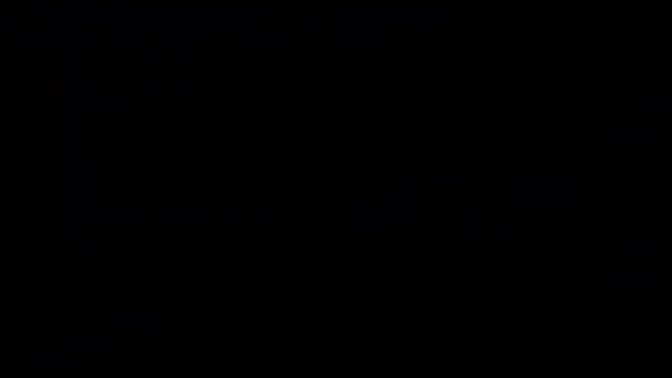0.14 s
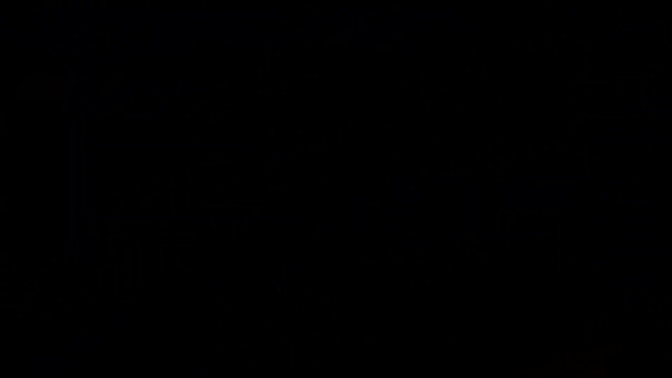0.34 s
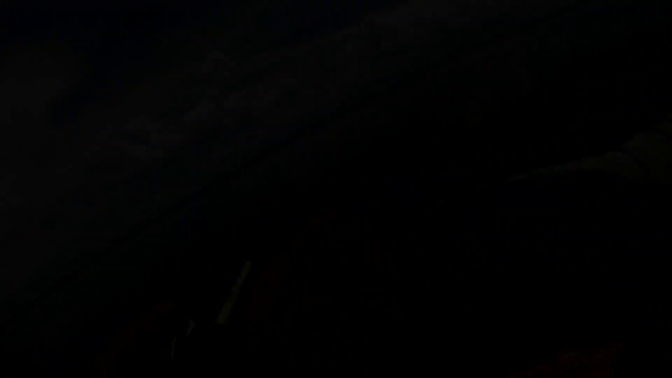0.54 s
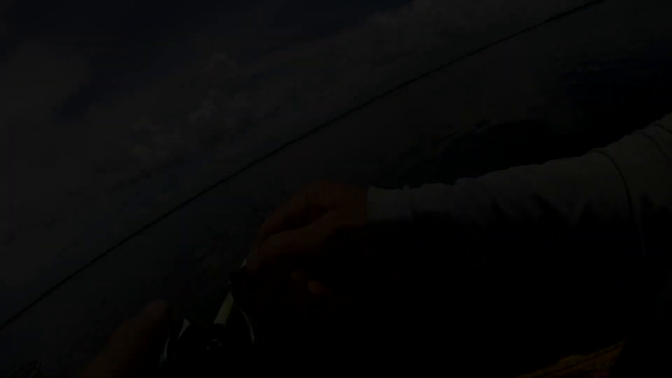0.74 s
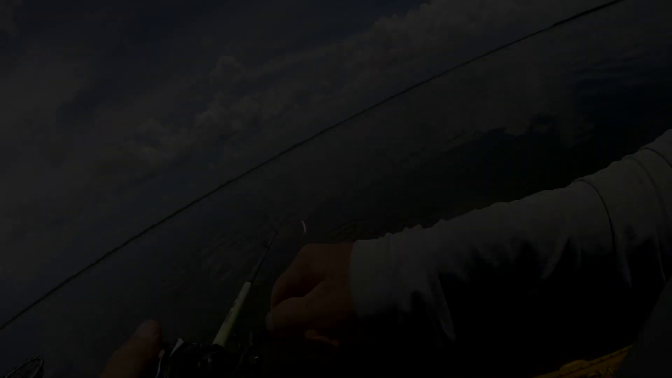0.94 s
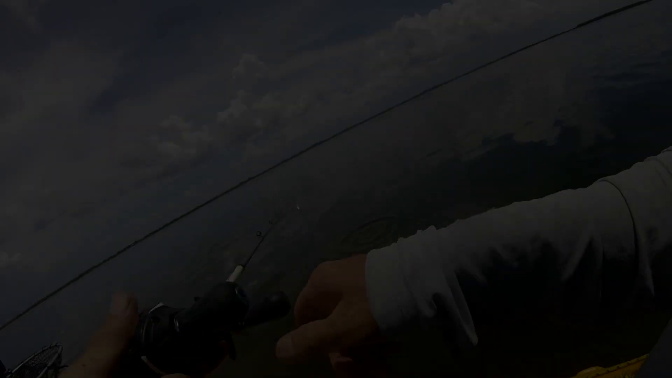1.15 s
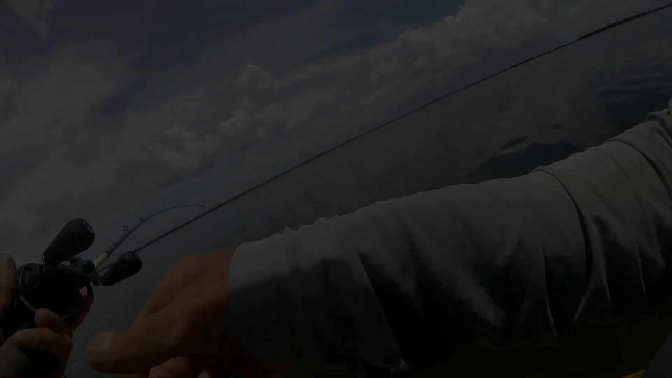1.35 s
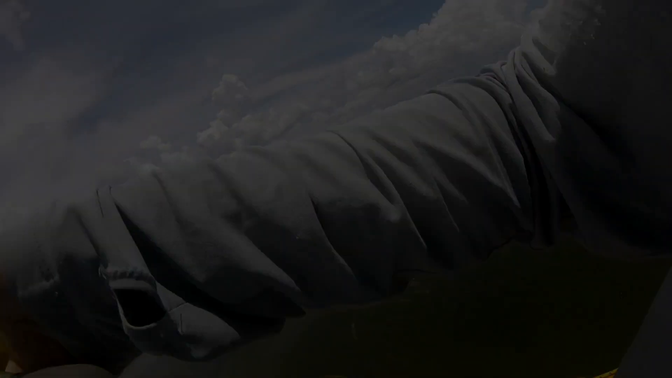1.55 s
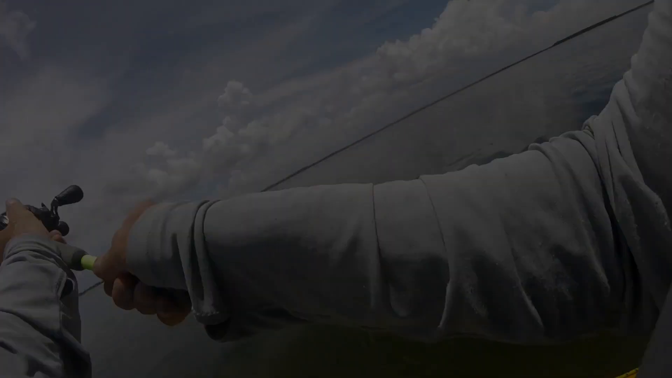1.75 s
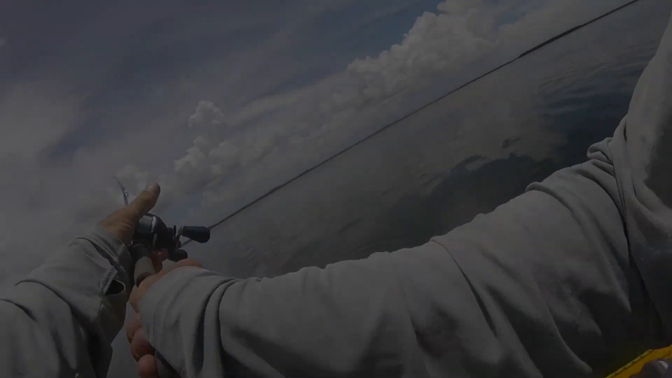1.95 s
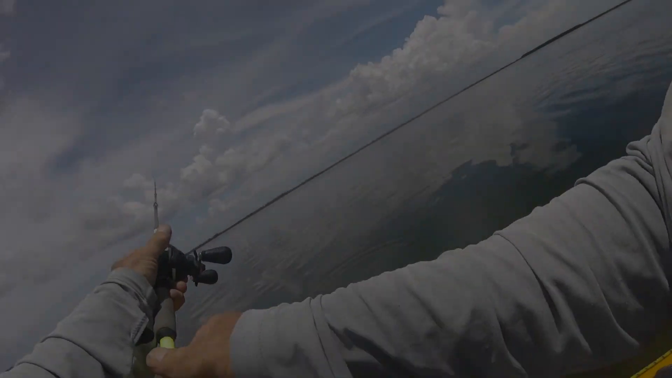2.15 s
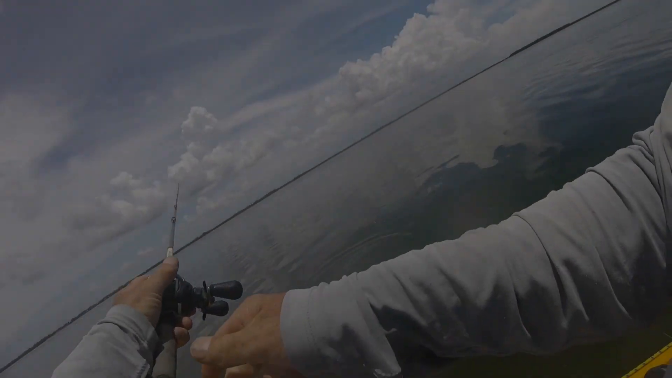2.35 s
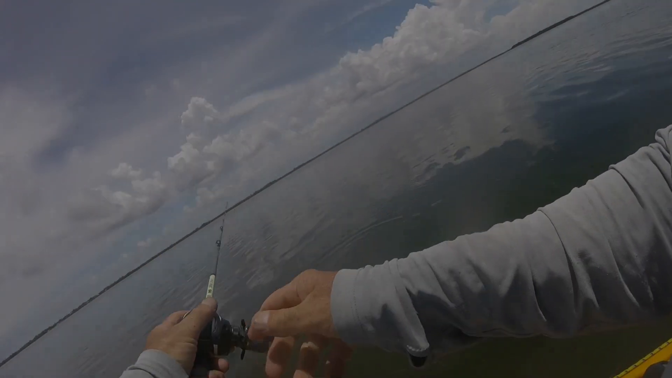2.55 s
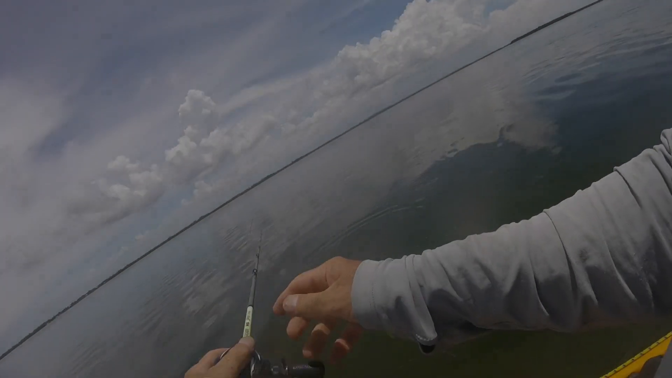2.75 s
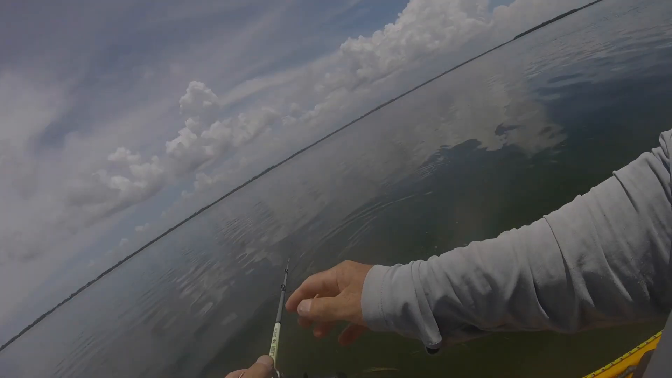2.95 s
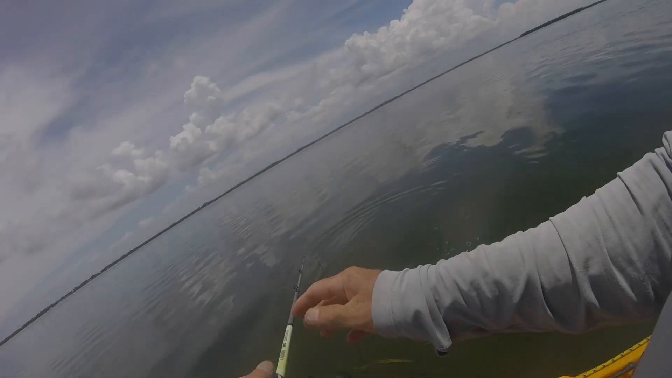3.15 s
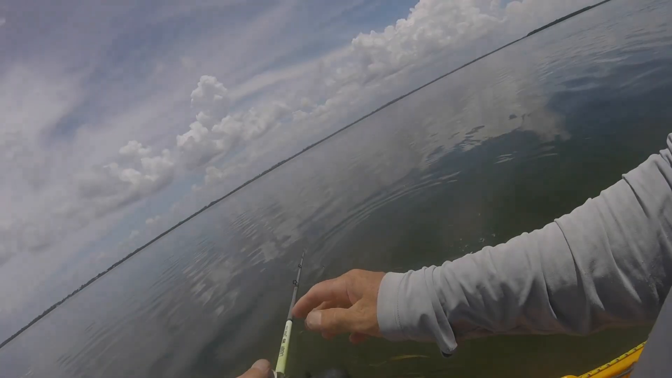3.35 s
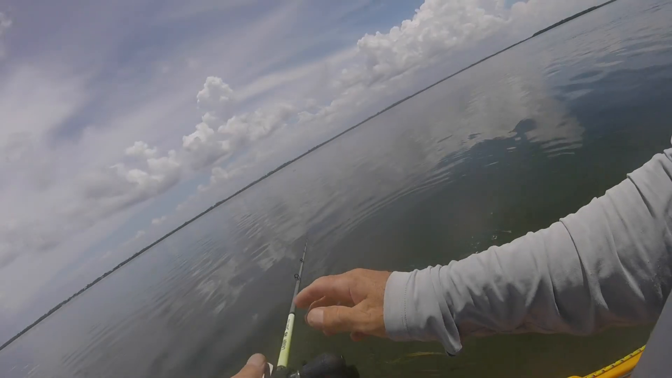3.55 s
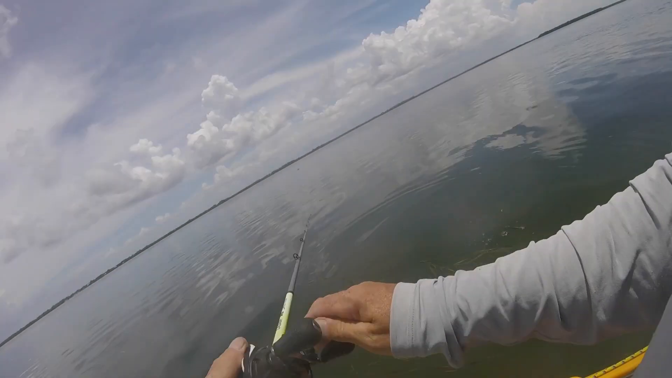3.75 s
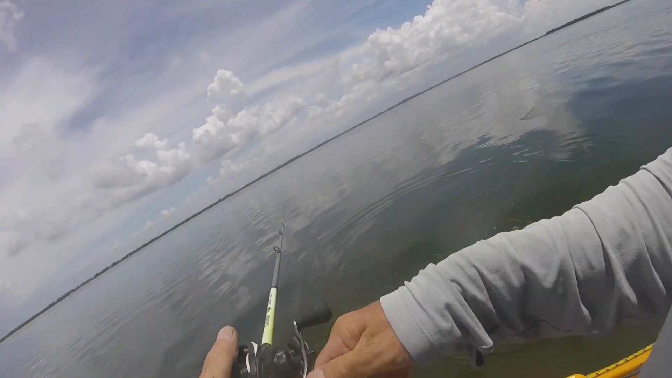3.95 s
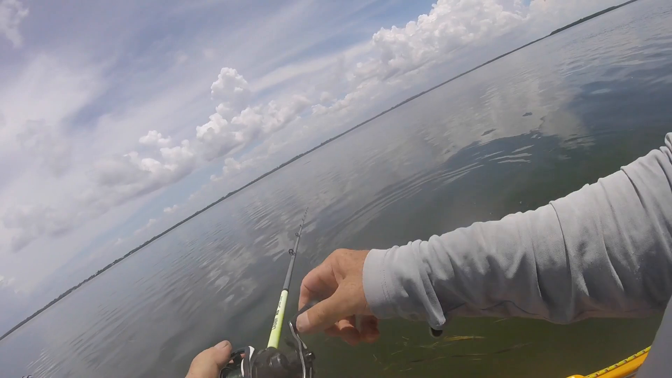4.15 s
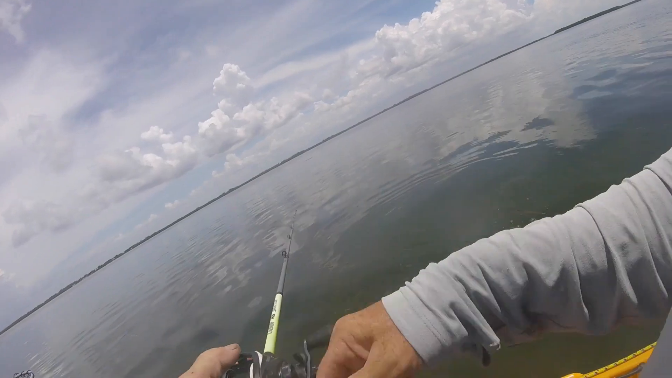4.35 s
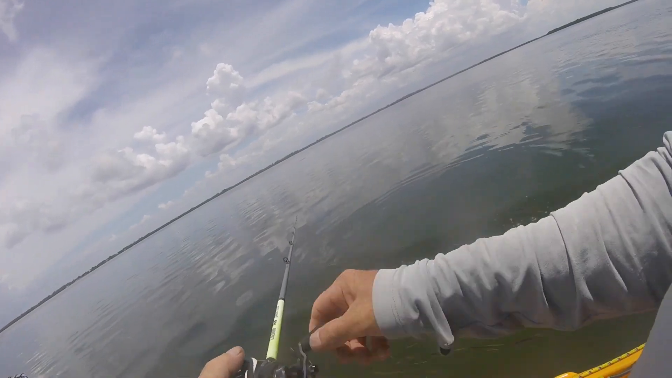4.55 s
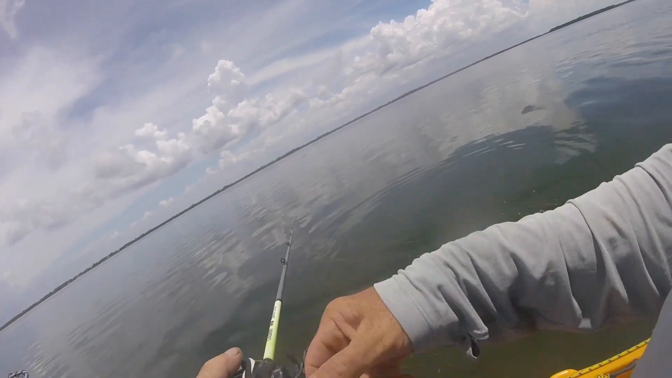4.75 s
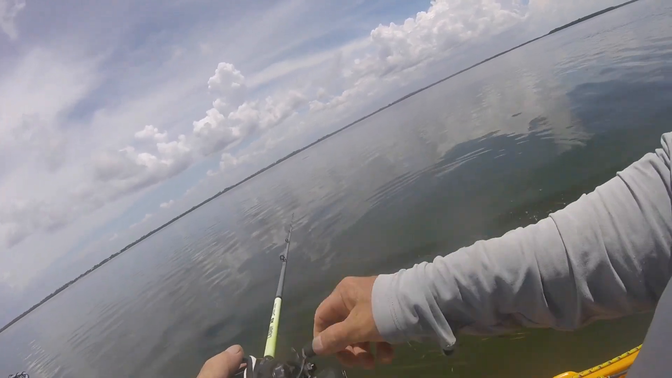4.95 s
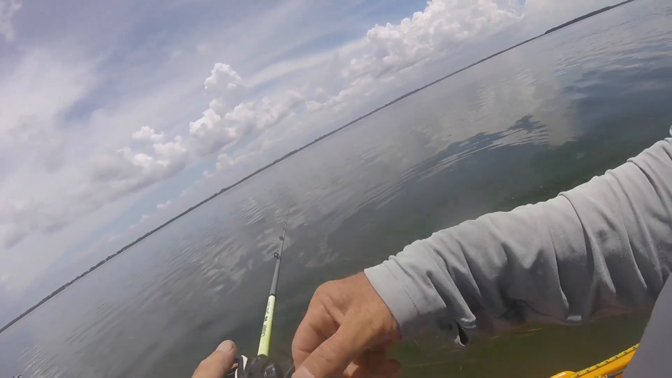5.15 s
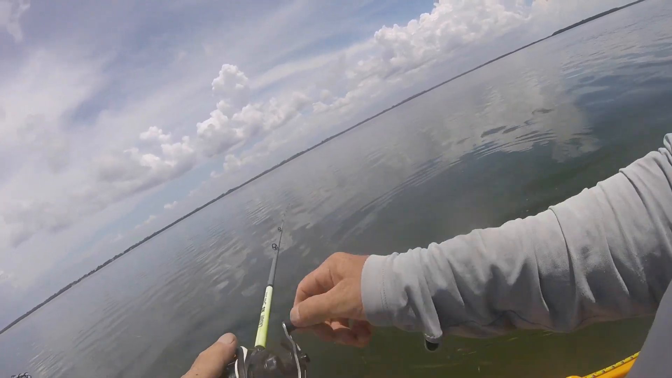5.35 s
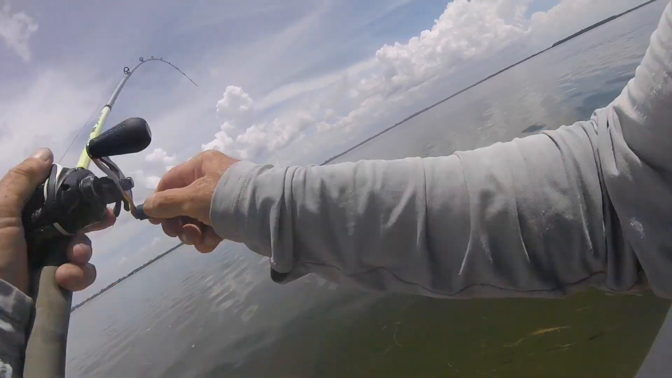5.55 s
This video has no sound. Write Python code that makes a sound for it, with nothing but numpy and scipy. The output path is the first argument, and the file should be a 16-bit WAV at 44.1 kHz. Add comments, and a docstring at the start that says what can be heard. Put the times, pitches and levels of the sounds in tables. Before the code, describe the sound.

One close fishing cast on a calm lake: a sharp click, a swish, a whirring spool, a second click and churning gears.

```python
"""One cast on a calm lake

A baitcasting reel in a small boat, heard from the angler's chest. Cranking ends with a few ticks,
the thumb bar snaps the clutch out and the rod swings. Line hisses off the spool and the bearings
drone as it slows, until the thumb stops it with a squeak. The handle snaps the clutch back in and
the gears churn, over a low rumble and a faint hiss."""
import sys
import numpy as np
from scipy import signal
from scipy.fft import rfft, irfft, next_fast_len
from scipy.io import wavfile
from scipy.ndimage import uniform_filter1d

SR = 44100
rng = np.random.default_rng(int(sys.argv[2]) if len(sys.argv) > 2 else 0)


def to_wav(s):
    """Save 16-bit WAV."""
    ch = np.atleast_2d(s).T  # columns
    pcm = np.round(np.clip(ch, -1, 1) * 32767)  # PCM
    wavfile.write(sys.argv[1], SR, pcm.astype(np.int16))


N = 250791
T = np.arange(N) / SR

# the clutch snaps out, then in; the last five columns are relative:
# (time [s], latch travel [s], level [dB], favoured pitch [Hz],
#  frame thud [dB], slip [dB], scrape [dB], edge [dB], bounce [dB])
CLUTCH_SNAPS = [(1.3071, .00155, -12.5, 4370, -8, -14, -16, -16, -13.5),
                (3.9363, .00385, -11, 6600, -0.5, -7.5, -3, -5, -11.5)]
# ringing tones of the reel's body: (pitch [Hz], level [dB], time to fade 60 dB before damping [s])
REEL_MODES = [(474, -16, 0.033), (744, -14, 0.035), (1166, 2.5, 0.027), (1410, -6, .03),
              (2240, -1.5, 0.018), (2760, -15, 0.0062), (3260, -10, 0.012), (3484, -6.5, .011),
              (4200, -6.5, 0.0095), (4650, -2.5, 0.0094), (5440, -5.5, 0.013), (6334, 4, 0.01),
              (6800, -2.5, .0098), (7600, -3, 0.0065), (8750, -4.5, 0.011), (11000, -2, 0.0036)]
# loose parts rattling: (frequency [Hz], level [dB])
RATTLE_COLOUR = [(250, -16), (900, -8), (1300, 3), (1750, -2.5), (2350, 3), (3000, 2.5), (6400, 7),
                 (7500, -1.5), (11500, -25), (14000, -43)]
# light taps on the reel: (time [s], level [dB], favoured pitch [Hz], frame thud [dB])
TICKS = [(.133, -49, 3560, -8), (.148, -38.5, 6000, 10), (.217, -36.5, 3600, 4), (.261, -48, 5000, -6),
         (0.3082, -43.5, 2300, -10), (0.309, -33, 6400, -2), (.421, -37, 2620, -7), (.426, -36, 5600, -7),
         (.476, -34.5, 3660, 8.5), (0.616, -50, 2000, 6), (0.667, -41.5, 3000, -11),
         (1.287, -39, 3240, -11), (1.861, -44, 4000, 2), (1.887, -45, 5000, 0), (3.878, -32.5, 5700, -6),
         (3.8795, -39, 3400, -3), (3.897, -40, 5000, 12), (3.915, -47, 1300, 0), (4.118, -47, 3000, 0),
         (4.145, -42, 6400, 18)]
# the rub around each tap: (frequency [Hz], level [dB])
GRIT_COLOUR = [(400, 6), (1000, 4), (2000, 2.5), (6300, -4), (7300, -9), (11000, -32)]

# line leaving a fast spool: (frequency [Hz], level [dB])
FAST_HISS_COLOUR = [(300, -2), (900, -4.5), (1850, -4.5), (2350, 3), (2800, -4), (3300, 1.5), (4300, 2.5),
                    (5600, 1), (6350, 5.5), (6900, -16), (7600, -3.5), (9500, -7), (10400, -19),
                    (11100, -20), (13000, -30)]
# line leaving a slow spool: (frequency [Hz], level [dB])
SLOW_HISS_COLOUR = [(300, -8), (900, -5.5), (1850, -3), (2400, 2.5), (2800, -0.5), (3300, 2.5), (3750, -6),
                    (4500, 5.5), (5500, -4), (6400, 10.5), (6950, 3.5), (9400, 3.5), (10300, -23),
                    (11200, -12), (13000, -27)]
# extra hiss as the lure first tugs the line: (middle [s], half length [s], level [dB])
LURE_TUG = [(1.965, 0.017, -55)]
# the note of the bearings: (time [s], pitch [Hz])
DRONE_PITCH = [(1.97, 1520), (2.15, 1460), (2.33, 1320), (2.53, 1245), (2.9, 1310), (3.2, 1260),
               (3.55, 1275)]
# whistles of the running line: (middle [s], half length [s], pitch [Hz], level [dB])
WHISTLES = [(1.93, 0.02, 6300, -46), (1.955, 0.013, 2335, -49.5), (2.083, 0.11, 3594, -54),
            (2.19, .06, 7700, -54), (2.62, .09, 8400, -59), (2.38, 0.071, 2390, -60),
            (2.55, .16, 3100, -60.5), (2.96, 0.17, 2435, -67)]
# skin rubbing the spool: (frequency [Hz], level [dB])
THUMB_COLOUR = [(250, -14), (480, -5), (720, 0), (930, -13), (1400, -3), (1750, -11), (2300, -12),
                (4000, -13), (9000, -28)]

# spells of turning the handle: (start [s], end [s], gear level [dB], line rasp level [dB])
CRANKING = [(-.05, 0.14, -56, -68.5), (3.87, 5.628, -55, -66.5)]
# gears heard through the reel's body: (frequency [Hz], level [dB])
GEAR_COLOUR = [(200, -26), (500, -12), (760, -4), (930, -8), (1150, 1), (1450, -9), (1700, -12.5),
               (1880, -9), (2020, -27), (2250, -11.5), (2700, -22.5), (3300, -23), (3800, -33), (6300, -27),
               (10000, -43)]
# tight spots where the gears swell: (middle [s], half length [s], level [dB])
TIGHT_SPOTS = [(4.08, 0.02, -58.5), (4.39, 0.054, -66), (4.645, 0.021, -57.5), (4.81, 0.041, -78),
               (5.09, 0.046, -67)]
# wet line rasping through the guide: (frequency [Hz], level [dB])
RASP_COLOUR = [(1200, -13), (2300, 2), (2750, -3.5), (3250, 3), (3850, -5.5), (4600, -1.5), (5600, -4),
               (6400, 4.5), (7200, -11), (11000, -30)]
# pulls of line through the guide: (middle [s], half length [s], level [dB])
LINE_PULLS = [(.165, 0.07, -59.5), (4.35, 0.077, -66.5), (4.65, .027, -69), (4.84, 0.039, -78),
              (5.11, 0.076, -71), (5.56, 0.042, -63)]
# loose gears knocking on the housing: (time [s], level [dB])
GEAR_KNOCKS = [(4.305, -47), (4.45, -41), (4.638, -44), (4.756, -49), (4.784, -52), (5.037, -52),
               (5.066, -43), (5.154, -51), (5.27, -48)]
# rubs of the handle's knob: (middle [s], half length [s], level [dB])
KNOB_RUBS = [(4.42, 0.082, -66), (4.81, .1, -63.5), (5.16, 0.06, -65)]

# wind-up, forward swing and follow-through: (start [s], rise [s], decay [s], level [dB])
SWINGS = [(1.58, 0.1, .089, -57), (1.743, .035, 0.065, -40), (1.84, 0.075, 0.11, -45)]
# rush of air and sleeve: (frequency [Hz], level [dB])
SWING_COLOUR = [(30, 13), (85, 7), (150, 1), (240, 0), (310, -5), (410, 2.5), (550, -9), (850, -4),
                (1130, -3.5), (1500, -20), (2500, -24.5), (6000, -49)]
# hands shifting their grip: (middle [s], half length [s], level [dB])
GRIP_SHIFTS = [(.27, 0.28, -56.5), (.62, .12, -65.5), (.82, .097, -62.5), (1.04, .045, -62.5),
               (1.27, .047, -64)]
# cloth and skin brushing: (frequency [Hz], level [dB])
RUSTLE_COLOUR = [(120, 6.5), (200, 1.5), (400, -2), (850, 0.5), (1600, -5.5), (3000, -15), (8000, -30)]
# fingers slipping on the reel's shell: (middle [s], half length [s], level [dB])
SCUFFS = [(.122, 0.01, -56.5), (.36, 0.13, -64), (1.225, 0.0091, -60), (1.246, 0.0092, -51.5),
          (1.289, 0.016, -56), (1.326, 0.0061, -52.5), (1.35, 0.012, -58), (1.741, .015, -54),
          (1.79, 0.015, -60), (1.89, .025, -64), (4.145, 0.0037, -50)]
# skin on plastic: (frequency [Hz], level [dB])
SCUFF_COLOUR = [(2000, -24), (3800, -14.5), (4700, -2.5), (5500, -4.5), (6300, 4.5), (7100, -17),
                (11000, -32)]
# soft bumps of hull and hands: (time [s], pitch [Hz], level [dB])
BUMPS = [(0.249, 170, -49.5), (.43, 158, -47.5), (1.85, 427, -41), (1.893, 320, -43.5), (2.585, 236, -49.5),
         (2.61, 336, -54), (3.893, 620, -47), (4.109, 200, -48), (5.502, 292, -47.5)]
# open lake and microphone hiss: (frequency [Hz], level [dB])
AIR_COLOUR = [(20, -4), (40, -1.5), (90, -13), (130, -5.5), (220, -11.5), (400, -16.5), (800, -23),
              (1600, -26), (3000, -31), (4300, -35), (5900, -32.5), (6500, -20.5), (7100, -27),
              (10000, -36.5), (12500, -38.5), (14000, -36.5)]

RELEASE_S, STOP_S = 1.875, 3.682  # the spool runs between these times
TOP_SPEED_HZ = 311.7  # spool turns a second
HOUSING_HZ = 1143  # ring of the hollow gear housing


def clutch(scrape_hz=2930, edge_hz=9700, bounce_hz=5650):
    """The sprung latch slips, scrapes, clips an edge, slams home and bounces three times."""
    hits = []
    for when, travel, db, hz, thud_db, slip_db, scrape_db, edge_db, bounce_db in CLUTCH_SNAPS:
        hits.append((when - travel, db + slip_db, hz, thud_db + 3))
        hits.append((when - travel / 2, db + scrape_db, scrape_hz, thud_db))
        hits.append((when - .0003, db + edge_db, edge_hz, thud_db))
        hits.append((when, db, hz, thud_db))
        bounces = when + np.cumsum(travel * .94 ** np.arange(3))  # each sooner than the last
        hits += [(at, db + bounce_db - 5 * k, bounce_hz, thud_db + 3) for k, at in enumerate(bounces)]
    return reel_hits(hits, crack_db=-8.5, crack_s=.0008, tail_db=-42.5, ring_share=.94, detune=0)


def ticks(grit_db=-17.5, grit_half_s=.004):
    """Handle, line and fingers tap the hand-damped reel, each with a brief gritty rub."""
    taps = reel_hits(TICKS, crack_db=-11.5, crack_s=.0016, tail_db=-24.5, ring_share=.75, detune=.018)
    grit = colour(grains(7000, 2.1), GRIT_COLOUR)
    return taps + grit * swells([(when, grit_half_s, db + grit_db) for when, db, _, _ in TICKS])


def reel_hits(hits, crack_db, crack_s, tail_db, ring_share, detune, tail_s=.014, focus_db=14.5):
    """Each hit makes the reel ring, with a short crack and a faint rattle of loose parts."""
    out, t = np.zeros(N + SR), T[:SR // 8]
    hz, db, fade_s = np.transpose(REEL_MODES)
    sign = (-1) ** np.arange(len(hz))
    rattle = colour(rng.standard_normal(N), RATTLE_COLOUR)
    for start, level_db, focus_hz, thud_db in hits:
        # with the clutch out the low tones ring higher, and the thumb shortens every ring
        clutch_out = CLUTCH_SNAPS[0][0] < start + .01 < CLUTCH_SNAPS[1][0]
        pitch = hz * (1 + .11 * clutch_out * (hz < 2400) + detune * rng.standard_normal(len(hz)))
        ring_s = fade_s * ring_share * (.87 if clutch_out else 1)
        tones = np.sin(2 * np.pi * pitch[:, None] * t) * np.exp(-np.log(1000) * t / ring_s[:, None])
        # the spot that is hit favours tones near one pitch; a heavy blow also shakes the frame
        nearness = bell(np.log2(hz / focus_hz), 0, .5)
        gain = undb(db + focus_db * nearness + thud_db * (hz < 1500))
        ring = (sign * gain) @ tones / np.sqrt(np.sum(gain ** 2))
        rattle_fade = undb(crack_db) * np.exp(-t / crack_s) + undb(tail_db) * np.exp(-t / tail_s)
        i = int(start * SR)
        out[i:i + len(t)] += undb(level_db) * (ring + rattle[i:i + len(t)] * rattle_fade)
    return out[:N]


def spool(wobble_hz=121, loudest_speed_hz=193, rod_hz=232):
    """Line hisses off the spool and the bearings drone; both pulse once a turn, ever slower."""
    speed = spool_speed() * (1 + .00822 * wander(25))
    turn = np.cos(phase(speed))
    fast = np.clip((speed - 125) / 130, 0, 1)  # 0 when slow, 1 when fast
    pulse = 1 + turn * (.31 + .3 * bell(speed, wobble_hz, 15))  # deepest where the spool wobbles
    fast_hiss = np.sqrt(fast) * colour(grains(14000, 1.1), FAST_HISS_COLOUR)
    slow_hiss = np.sqrt(1 - fast) * colour(grains(12000, 2.9), SLOW_HISS_COLOUR)
    hiss = dull(fast_hiss + slow_hiss, speed) * undb(.89 * wander(45)) * pulse
    # a fast spool, slightly off balance, hums and shakes the rod
    hum = undb(-15 + 2.5 * wander(16)) * turn
    rod = undb(-12) * resonance(rod_hz, 28)
    # a slow spool leans on its bearing once a turn, so the drone purrs
    purr = 1 + turn * .7 * (1 - fast)
    pitch = np.interp(T, *np.transpose(DRONE_PITCH))
    drone = undb(-3) * resonance(pitch, 225) * purr
    song = undb(-7) * bearing_song(speed, pitch)
    bearing_gain = undb(-53.5 - 4.5 * np.log2(speed / loudest_speed_hz) ** 2)
    spinning = gate(RELEASE_S, STOP_S, rise_s=.071, fall_s=.033)
    return (hiss + fast * (hum + rod)) * line_gain(speed) + (drone + song) * bearing_gain * spinning


def spool_speed(spin_up_s=.095, end_speed_hz=64.1, coast_s=.69):
    """Turns a second: the spool quickly spins up, then the brake bleeds its speed away."""
    spin_up = np.interp(T, [RELEASE_S, RELEASE_S + spin_up_s], [.64, 1])
    coasting = np.maximum(T - RELEASE_S - spin_up_s, 0)
    return spin_up * (end_speed_hz + (TOP_SPEED_HZ - end_speed_hz) * np.exp(-coasting / coast_s))


def bearing_song(speed, centre_hz, width_hz=260, waver_hz=29.99):
    """Wavering overtones of the spool's turn sing out as they slide past the bearings' note."""
    angle, out = phase(speed), 0
    for order in range(3, 20):
        weight = 1 / (1 + (2 * (order * speed - centre_hz) / width_hz) ** 2)
        overtone = wander(waver_hz) * np.cos(order * angle) + wander(waver_hz) * np.sin(order * angle)
        out = out + weight * overtone
    return unit(out * np.sqrt(speed))


def line_song():
    """Running line whistles, rings the guide and adds a thin sheen; the last two rise as it slows."""
    speed = spool_speed()
    waver = 1 + .015 * wander(14)
    whistles = sum(resonance(hz * waver, 300) * swells([(when, half, db)])
                   for when, half, hz, db in WHISTLES)
    sheen = undb(-14) * dull(resonance(9700 - 2504 * speed / TOP_SPEED_HZ, 1100), speed)
    guide = undb(-8) * resonance(waver * (6540 - 259.6 * speed / TOP_SPEED_HZ), 330)
    return whistles * undb(2 * wander(60)) + (sheen + guide) * line_gain(speed)


def line_gain(speed, top_speed_db=-45.5, db_per_octave=5):
    """Faster line is louder, with a surge at the lure's first tug."""
    running = gate(RELEASE_S, STOP_S, rise_s=.04, fall_s=.089) ** 2
    level_db = top_speed_db + db_per_octave * np.log2(speed / TOP_SPEED_HZ)
    return running * (undb(level_db) + swells(LURE_TUG))


def dull(hiss, speed, slow_hz=120, db_per_octave=4):
    """Slow line loses the top of its hiss."""
    low = signal.sosfiltfilt(signal.butter(4, 8000, fs=SR, output="sos"), hiss)
    return low + (hiss - low) * undb(db_per_octave * np.minimum(np.log2(speed / slow_hz), 0))


def thumb(start_s=3.588, end_s=3.68, rise_s=.025, decay_s=.06, sag_hz_per_s=9000):
    """Skin squeaks on the wound line, sagging in pitch, and rubs until the spool stops."""
    age = np.maximum(T - start_s, 0)
    pitch = np.maximum(1440 - sag_hz_per_s * age, 1110) + 50 * wander(280)
    squeak = unit(np.sin(phase(pitch))) * np.exp(-np.maximum(age - rise_s, 0) / decay_s)
    squeak *= gate(start_s, end_s, rise_s, fall_s=.008)
    rub = undb(-1) * colour(grains(3370, 2.3), THUMB_COLOUR)
    rub *= gate(start_s, end_s, rise_s=.045, fall_s=.048)
    return (squeak + rub) * undb(-53 + 3.5 * wander(110))


def gears(throb_hz=19, slack_s=5.33):
    """Greased teeth rub inside the hollow body as the handle turns, and wet line rasps in."""
    throb = np.sin(phase(throb_hz * (1 + .148 * wander(4))))
    housing = undb(-3) * resonance(HOUSING_HZ * (1 + .05 * wander(16)), 170)  # shifts with the grip
    teeth = colour(grains(5000, 1.6), GEAR_COLOUR)
    churn = unit(teeth + housing) * undb(1.6 * wander(90) + 1.1 * throb)
    rasp = colour(grains(2200, 3.8), RASP_COLOUR) * undb(1.7 * wander(40))
    taut = 1 - bell(T, slack_s, .093)  # slack line stops rasping for a moment
    out = churn * swells(TIGHT_SPOTS) + rasp * swells(LINE_PULLS)
    for start, end, gear_db, rasp_db in CRANKING:
        turning = gate(start, end, rise_s=.2 * (end - start), fall_s=.039)
        out += turning * (undb(gear_db) * churn + undb(rasp_db) * taut * rasp)
    return out


def handle(knob_hz=1713):
    """Loose gears knock on the housing, and the knob gives a rough rub on each turn."""
    knocks = sum(knock(start, HOUSING_HZ, db, rise_s=.0021) for start, db in GEAR_KNOCKS)
    rub = resonance(knob_hz * (1 + .03 * wander(12)), 560) * undb(3 * wander(70))
    return knocks + rub * swells(KNOB_RUBS)


def swing(puff_at_s=1.785, puff_decay_s=.047, puff_hz=30.2, puff_db=-30.5):
    """The sleeve flutters past and pushes one puff of air onto the microphone."""
    motion = 0
    for start, rise, decay, db in SWINGS:
        fade = np.exp(-np.maximum(T - start - rise, 0) / decay)
        motion = motion + undb(db) * np.clip((T - start) / rise, 0, 1) * fade
    rush = colour(rng.standard_normal(N), SWING_COLOUR) * undb(3 * wander(49.73)) * motion
    age = T - puff_at_s
    puff_shape = np.exp(-np.abs(age) / puff_decay_s) * np.clip(1 + 2 * age / puff_decay_s, 0, 1)
    return rush + undb(puff_db) * puff_shape * np.cos(2 * np.pi * puff_hz * age)


def rustle():
    """Cloth and skin brush over the grip."""
    return colour(grains(3000, 3.2), RUSTLE_COLOUR) * undb(1.4 * wander(50.35)) * swells(GRIP_SHIFTS)


def scuffs():
    """Skin makes short dry slips on plastic."""
    return colour(grains(2200, 9.1), SCUFF_COLOUR) * swells(SCUFFS)


def bumps():
    """Hull and hands knock softly."""
    return sum(knock(start, hz, db, rise_s=.0041) for start, hz, db in BUMPS)


def lake(air_db=-56, rumble_db=-55):
    """Light air wavers over open water, with a distant low rumble and a steady hiss."""
    air = colour(rng.standard_normal(N), AIR_COLOUR)
    low = signal.sosfilt(signal.butter(1, 900, fs=SR, output="sos"), air)
    air += low * (undb(wander(9)) - 1)  # only the low part wavers
    return undb(air_db) * air + undb(rumble_db) * resonance(66, 25.7)


def knock(start, hz, db, rise_s):
    """A dull ring that swells and dies within a few cycles."""
    age = np.maximum(T - start, 0)
    return undb(db) * age / rise_s * np.exp(1 - age / rise_s) * np.sin(2 * np.pi * hz * age)


def grains(per_second, spread_db):
    """Rubbing as many tiny contacts of uneven size."""
    size = rng.choice([-1, 1], N) * undb(spread_db * np.clip(rng.standard_normal(N), -2, 2))
    return (rng.random(N) < per_second / SR) * size


def resonance(centre_hz, width_hz):
    """Noise ringing around one pitch, which may move."""
    lowpass = signal.butter(2, width_hz / 2, fs=SR, output="sos")
    slow = signal.sosfilt(lowpass, rng.standard_normal(N) + 1j * rng.standard_normal(N))
    return unit(np.real(slow * np.exp(1j * phase(centre_hz * np.ones(N)))))


def colour(x, points):
    """Shape the lows and highs of x by (frequency [Hz], level [dB]) points, at strength 1."""
    hz, db = np.transpose(points)
    size = next_fast_len(N)
    f = np.maximum(np.arange(size // 2 + 1) * SR / size, 1)
    gain = undb(np.interp(np.log(f), np.log(hz), db)) * np.minimum(f / hz[0], 1) ** 2
    return unit(irfft(rfft(x, size) * gain, size)[:N])


def wander(rate_hz):
    """A smooth random drift of strength 1."""
    knots = rng.standard_normal(int(N / SR * rate_hz) + 2)
    path = np.interp(T * rate_hz, np.arange(len(knots)), knots)
    return unit(uniform_filter1d(path, int(SR / rate_hz / 2) + 1))


def gate(start, end, rise_s, fall_s):
    """Fade in, hold and fade out."""
    return np.clip((T - start) / rise_s, 0, 1) * np.clip((end - T) / fall_s, 0, 1)


def swells(rows):
    """A smooth rise and fall for each (middle [s], half length [s], level [dB])."""
    return sum(undb(db) * bell(T, when, half) for when, half, db in rows)


def bell(x, middle, half_width):
    """A smooth hump of height 1."""
    return np.exp(-((x - middle) / half_width) ** 2)


def phase(hz):
    """The angle turned so far at a changing rate."""
    return 2 * np.pi * np.cumsum(hz) / SR


def undb(db):
    """Turn decibels into a gain."""
    return 10 ** (np.asarray(db) / 20)


def unit(x):
    """Scale to an average strength (rms) of 1."""
    return x / np.sqrt(np.mean(x ** 2))


def scene():
    """Reel, angler and lake in one channel."""
    reel = clutch() + ticks() + spool() + line_song() + thumb() + gears() + handle()
    angler = swing() + rustle() + scuffs() + bumps()
    return (reel + angler + lake())[None]


def record(dry, soften_hz=12600, cut_hz=14200):
    """The microphone softens the high treble, and the very top is cut off."""
    soft = signal.sosfilt(signal.butter(8, soften_hz, fs=SR, output="sos"), dry)
    return signal.sosfilt(signal.ellip(8, .2, 70, cut_hz, fs=SR, output="sos"), soft)


dry = scene()
out = record(dry)
to_wav(out)
```